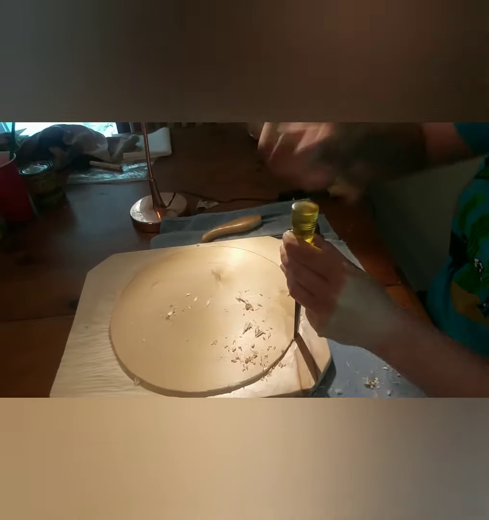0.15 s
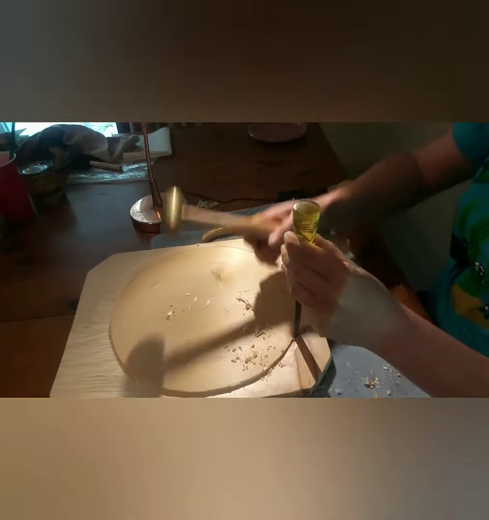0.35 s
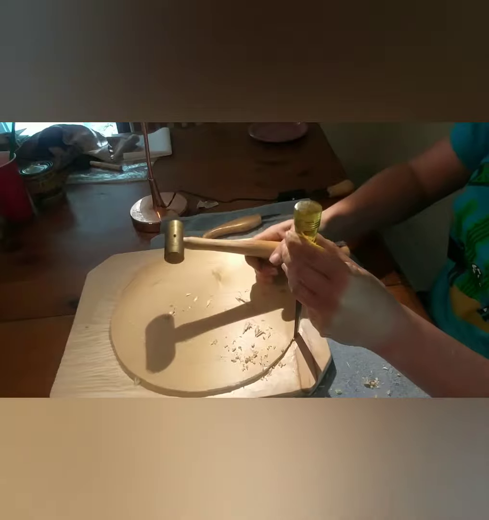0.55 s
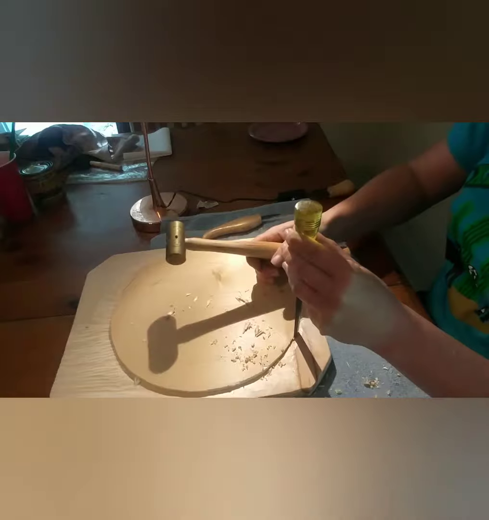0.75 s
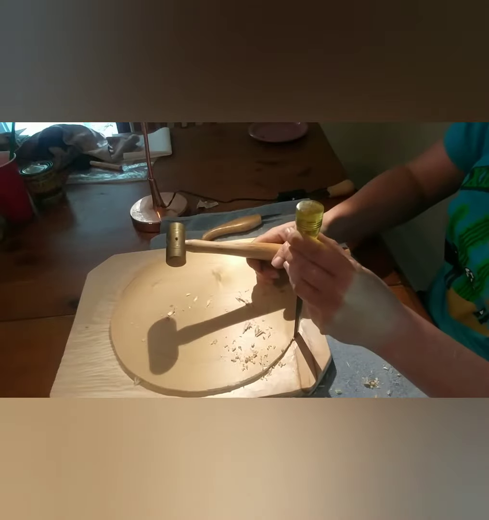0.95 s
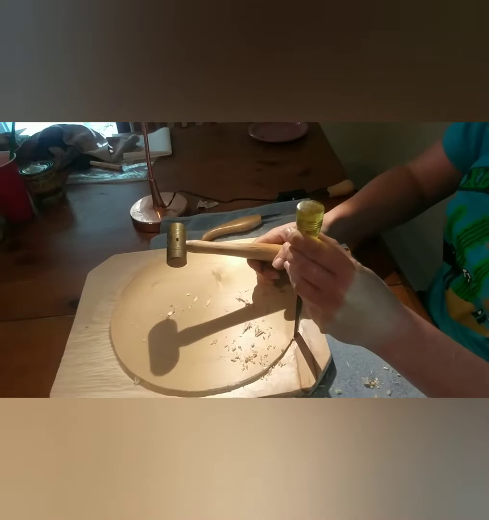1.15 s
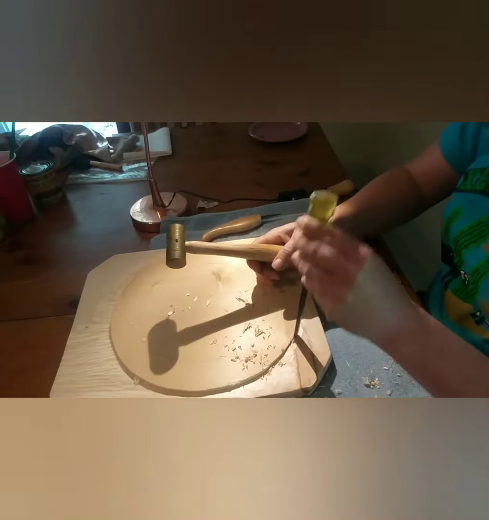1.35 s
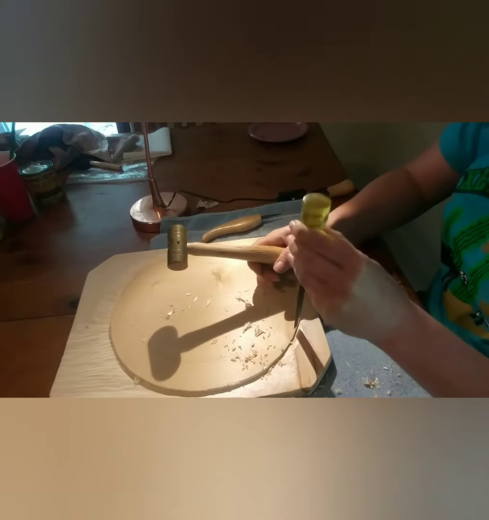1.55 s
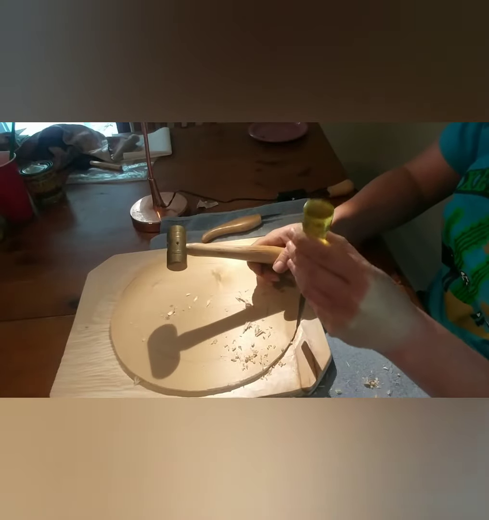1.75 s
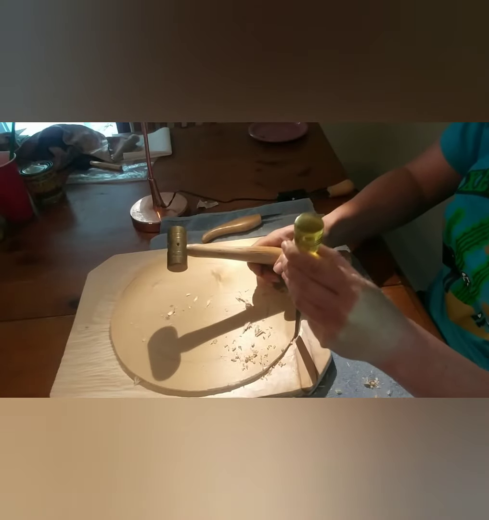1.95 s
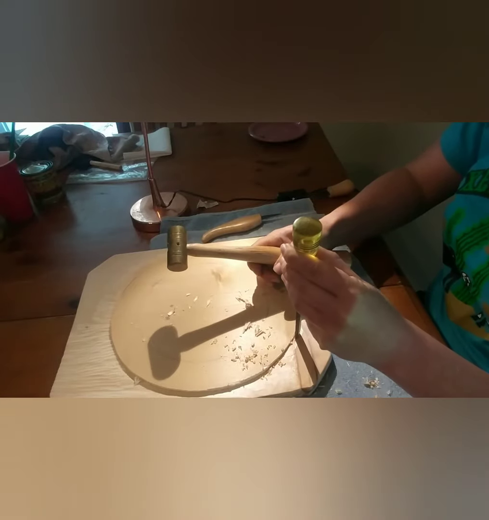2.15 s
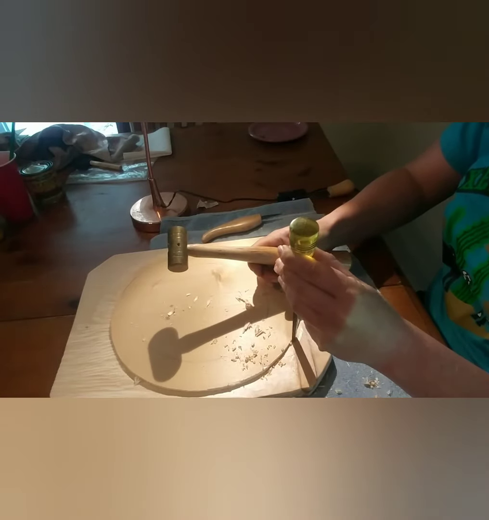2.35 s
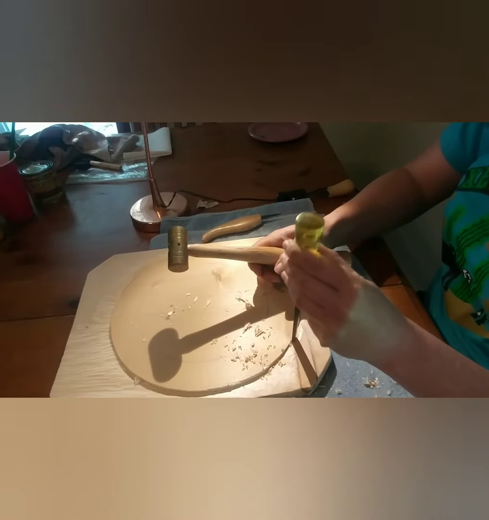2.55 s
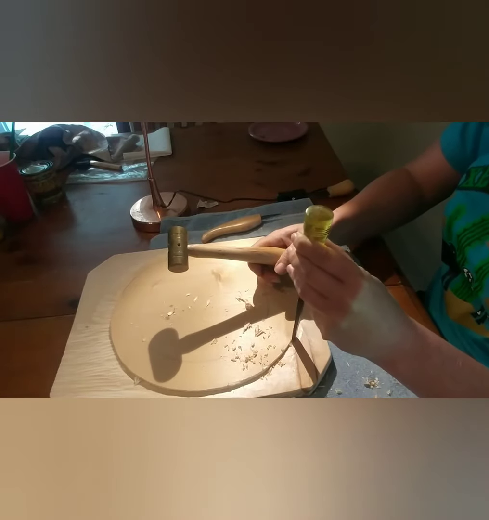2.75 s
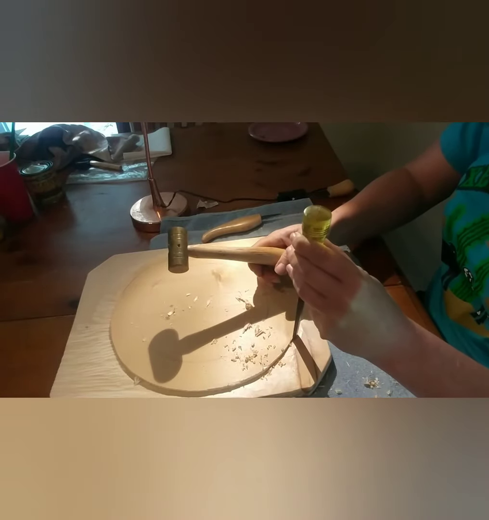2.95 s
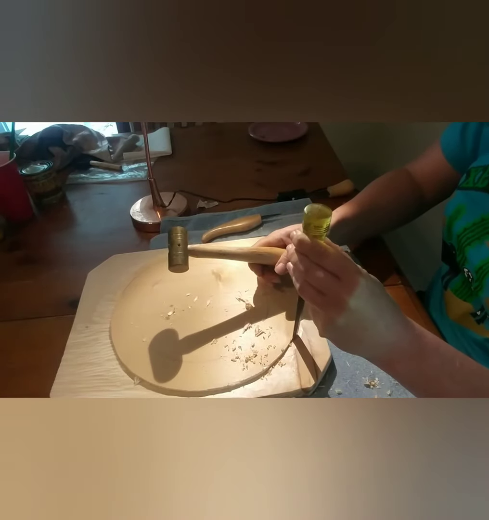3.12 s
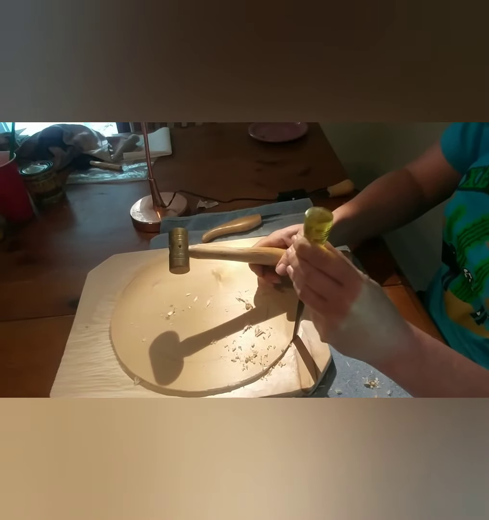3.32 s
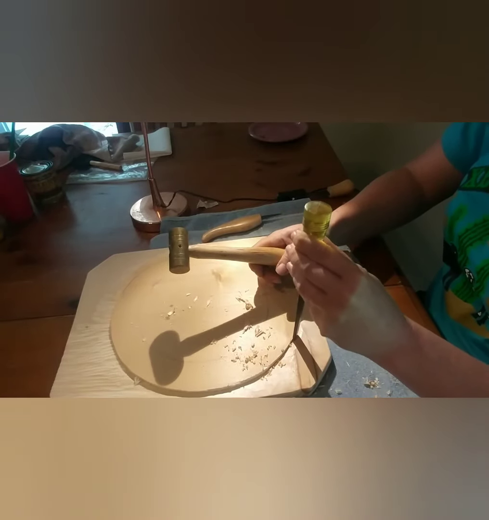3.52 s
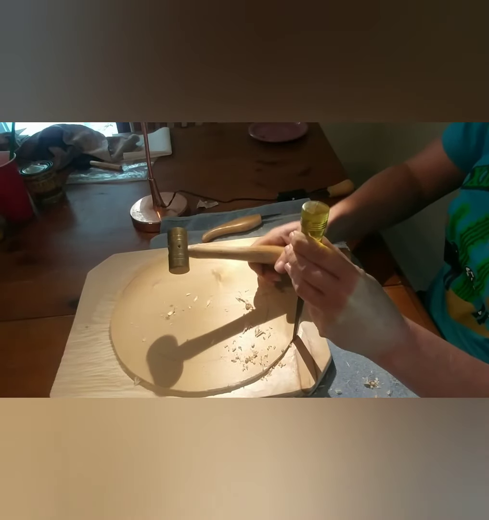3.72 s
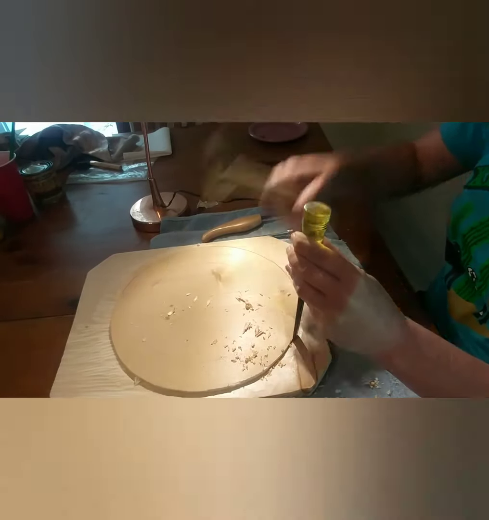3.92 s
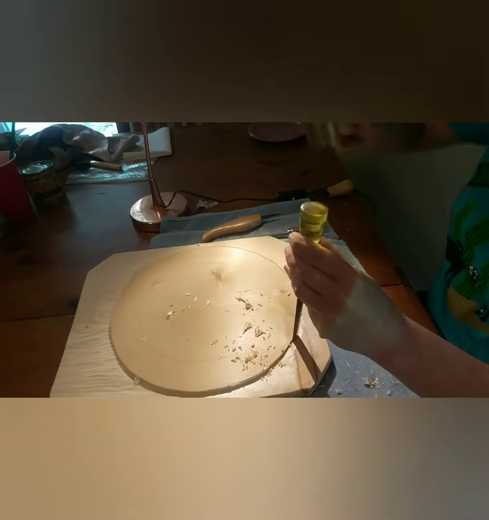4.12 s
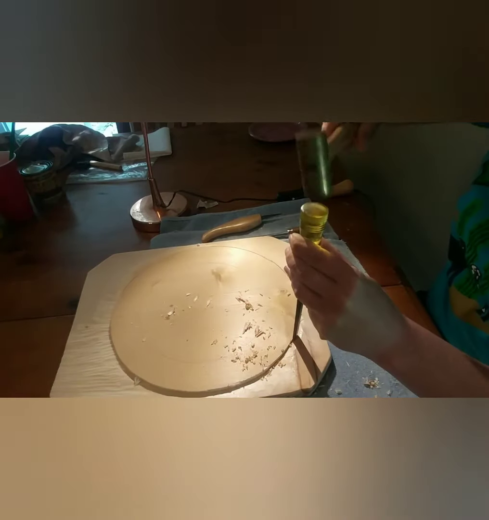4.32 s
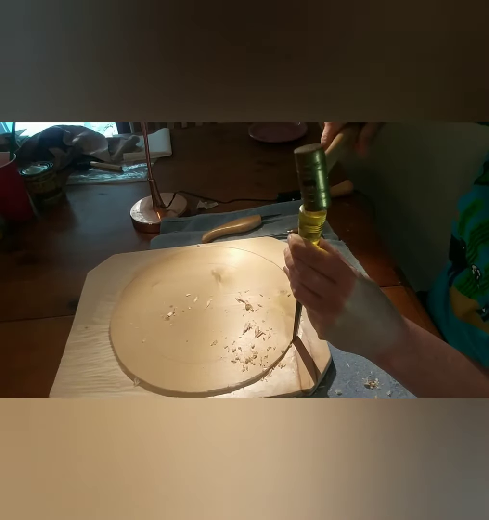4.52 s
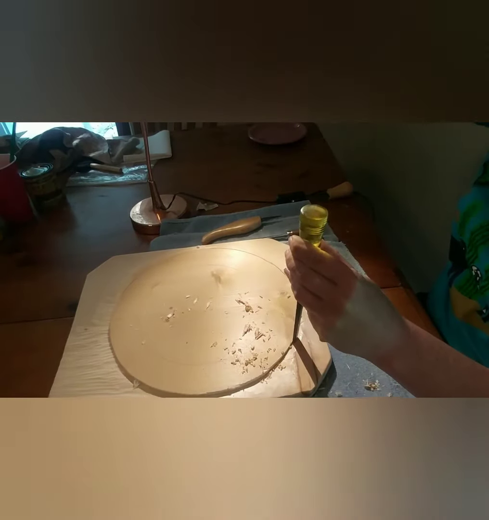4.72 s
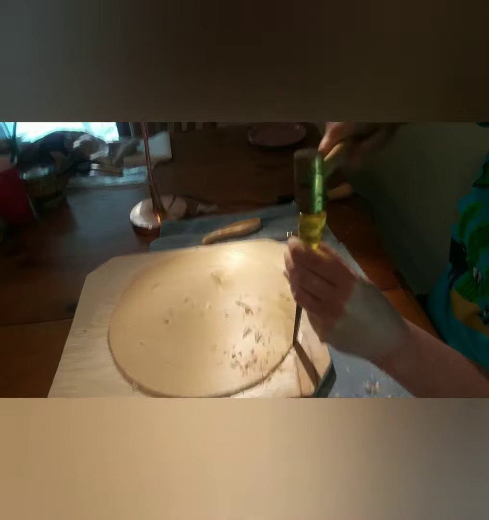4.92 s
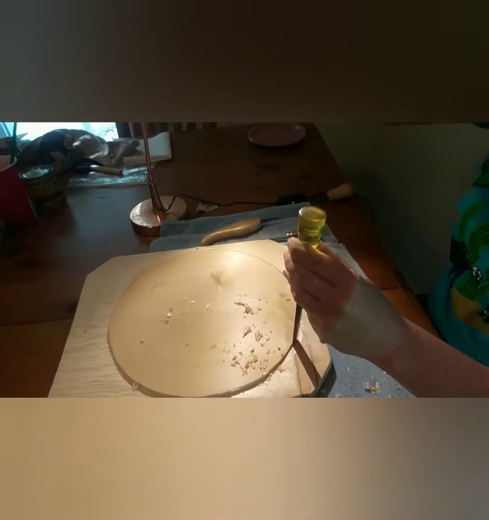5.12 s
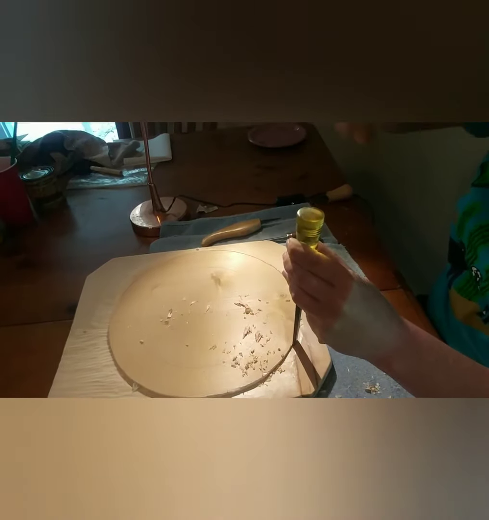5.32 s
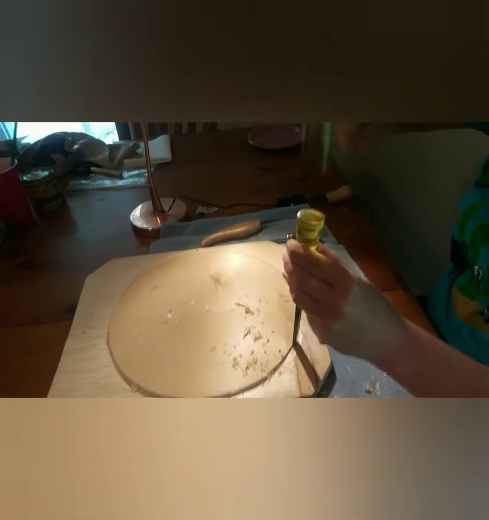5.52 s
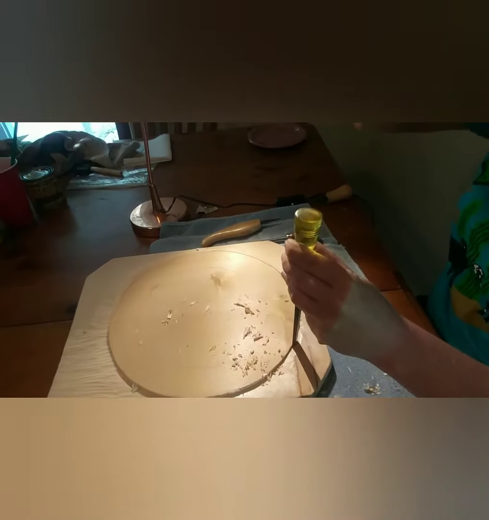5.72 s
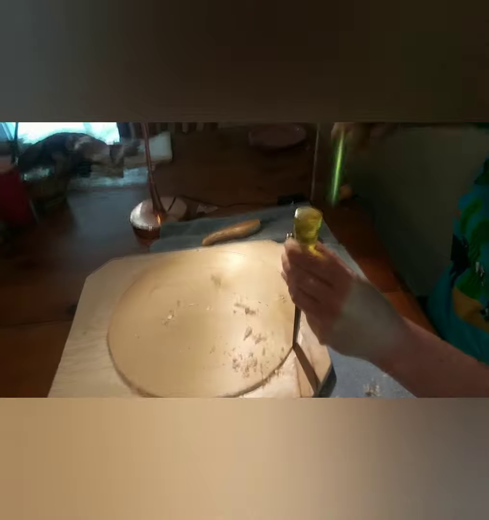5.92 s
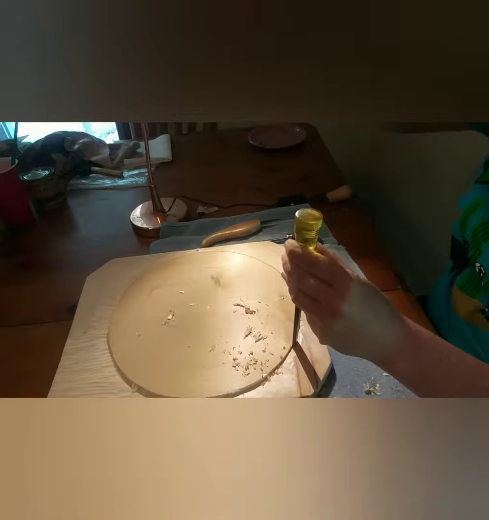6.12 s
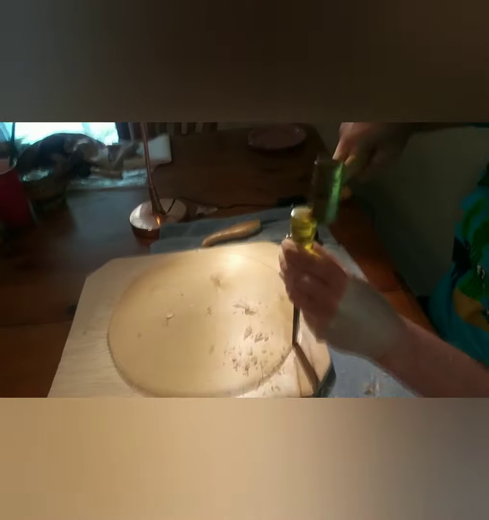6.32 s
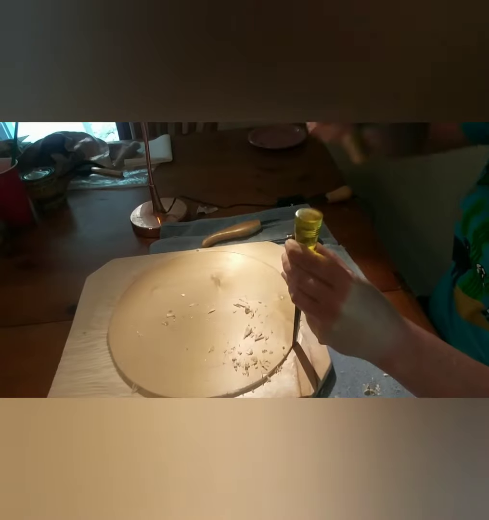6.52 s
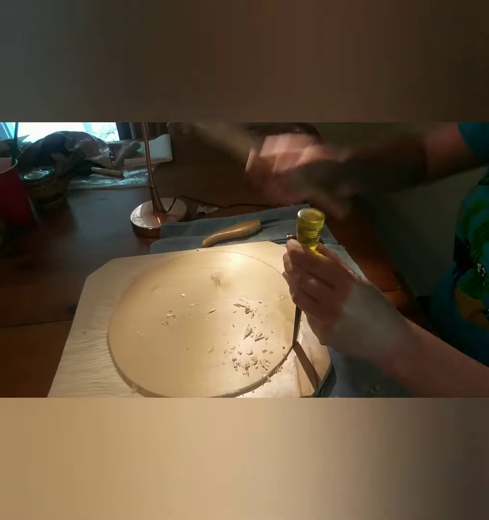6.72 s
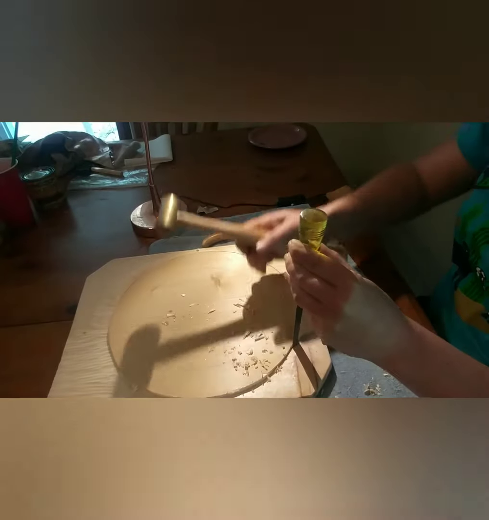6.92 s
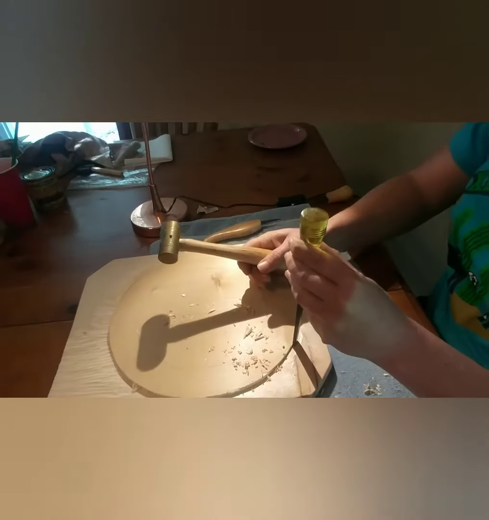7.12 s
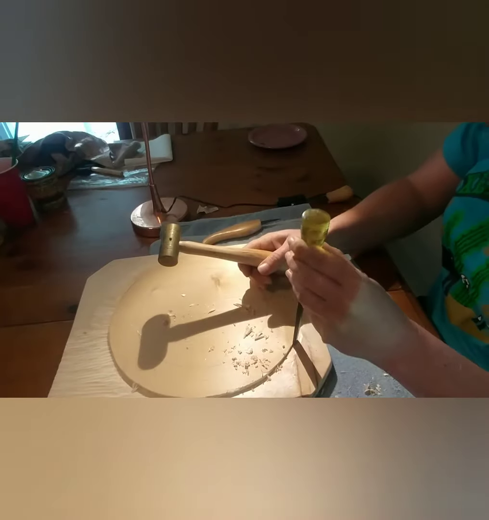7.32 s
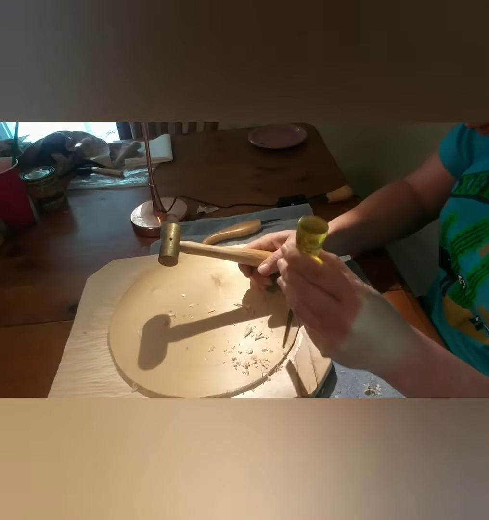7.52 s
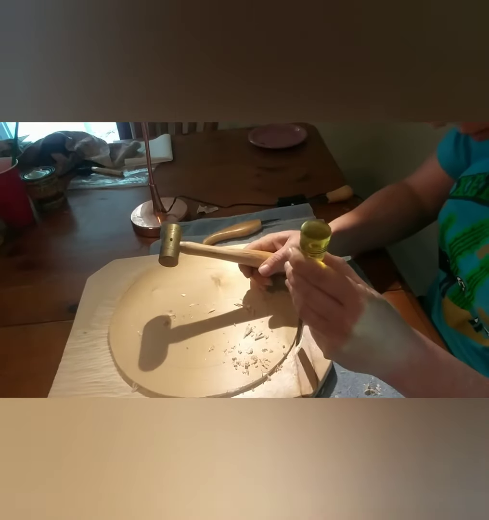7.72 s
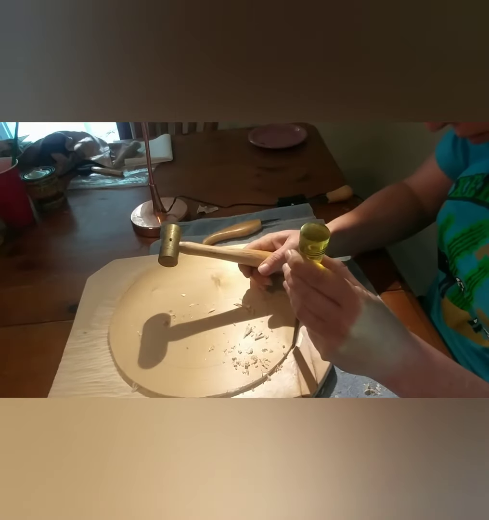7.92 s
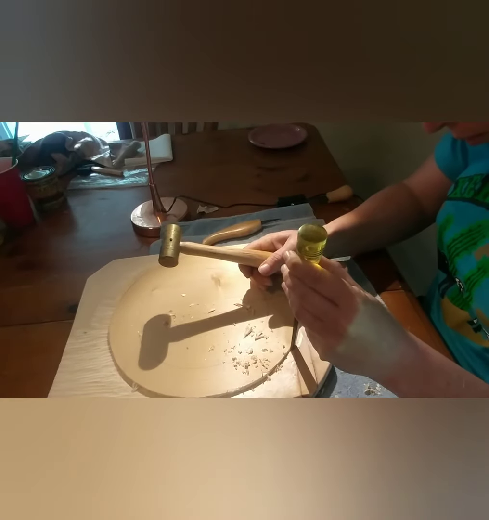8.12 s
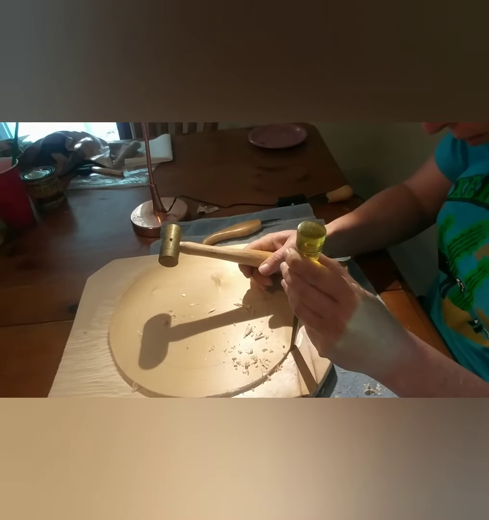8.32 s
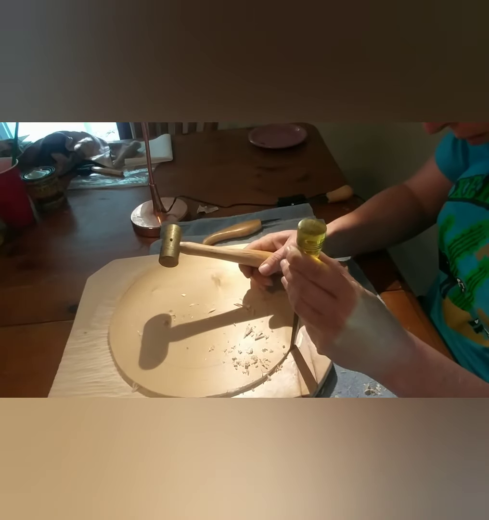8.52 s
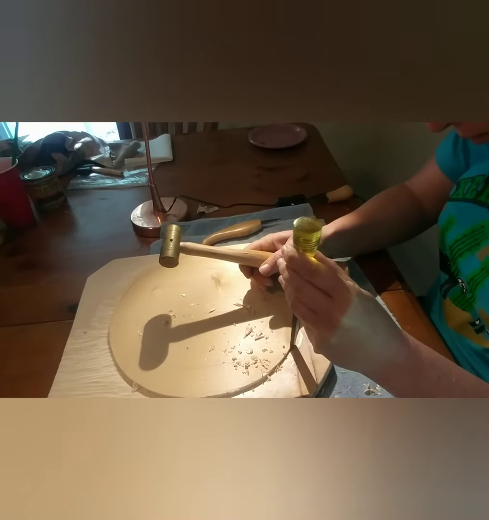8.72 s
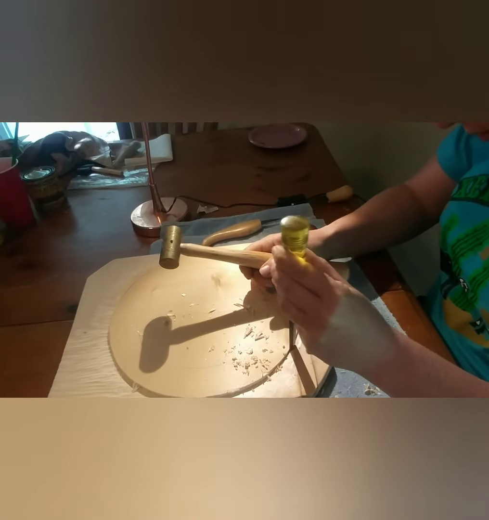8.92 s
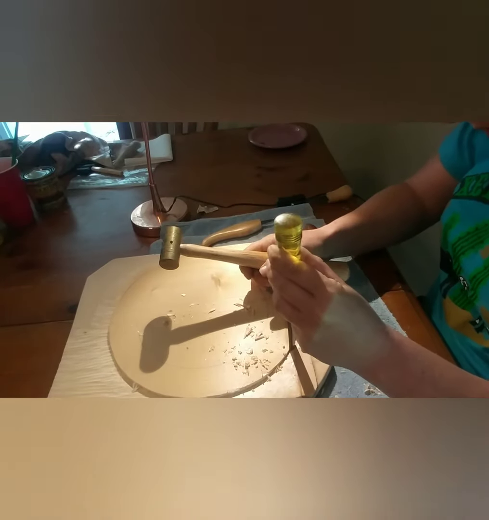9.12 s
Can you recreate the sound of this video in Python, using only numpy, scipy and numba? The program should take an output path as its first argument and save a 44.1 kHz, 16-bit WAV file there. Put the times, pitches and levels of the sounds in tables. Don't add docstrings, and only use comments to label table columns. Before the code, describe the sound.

A soft tap then four hard, ringing mallet blows on a chisel in wood, with water dripping and a small pump humming to the right.

```python
import sys
import numpy as np
from scipy import signal
from scipy.fft import rfft, irfft, next_fast_len
from scipy.io import wavfile
from scipy.ndimage import minimum_filter1d, map_coordinates
from numba import njit

SR = 44100
rng = np.random.default_rng(int(sys.argv[2]) if len(sys.argv) > 2 else 0)


def generate_wav(sig):
    pcm = np.round(np.clip(np.atleast_2d(sig).T, -1, 1) * 32767).astype(np.int16)
    wavfile.write(sys.argv[1], SR, pcm)


def gain_from_decibels(decibels):
    exponent = np.asarray(decibels, float) / 20
    return 10 ** exponent


N = 403956
LEAD = SR // 2

# frequency in Hz, level in dB per Hz.
AIR_SPECTRUM = [(15, -34.5), (25, -5), (58, -8), (185, -6.5), (335, -13), (439, -19), (545, -8.5),
                (775, -22.5), (1070, -17.5), (1190, -24), (3720, -18), (7510, -27), (10700, -42),
                (14000, -36), (15750, -34), (15900, -70)]
# frequency in Hz, left-right likeness from -1 to 1.
AIR_LIKENESS = [(60, 0.73), (180, 0.54), (550, 0.82), (1650, -0.51), (4970, -0.07), (15000, 0.08)]
# frequency in Hz, level in dB rms.
PUMP_ORDERS = [(59.2, -61.5), (118.4, -65), (177.6, -68), (236.9, -68), (414.5, -78.5), (500.6, -74.5),
               (592.2, -86), (710.6, -77)]
# frequency in Hz, t60 in seconds.
ROOM_DECAY = [(60, 0.41), (250, 0.29), (1000, 0.29), (3000, .3), (7000, 0.31), (9500, .25), (12500, 0.23)]
# frequency in Hz, left-right likeness from -1 to 1.
ECHO_LIKENESS = [(60, 0.9), (300, 0.9), (550, 0.25), (1650, 0.033), (4970, 0.07), (15000, 0.043)]
# start in seconds, peak level in dB, pitch in Hz.
CLEAR_DRIPS = [(0.2573, -50, 1800), (0.3805, -51, 3700), (0.7347, -49, 4000), (1.0385, -51, 3500),
               (1.3897, -50.5, 4340), (1.7997, -47, 3820), (1.8301, -36, 4340), (2.0012, -47, 3600),
               (2.5346, -45, 3300), (2.9551, -43, 3450), (3.2534, -44.5, 2690), (3.3607, -46, 3650),
               (3.444, -43, 2780), (3.5044, -40, 5260), (3.7438, -39.5, 3560), (3.9908, -48.5, 4200),
               (4.1813, -42, 3660), (4.3649, -46.5, 4200), (4.7989, -48.5, 2370), (6.7955, -44.5, 1950),
               (6.8464, -45, 4350), (6.9442, -41.5, 3900), (7.2175, -43, 3820), (7.4575, -48, 3790),
               (7.892, -49, 4490), (7.9479, -46, 3710), (8.3385, -45, 2236), (8.5959, -46, 4340),
               (8.6952, -41.5, 3760), (8.8109, -47, 3210)]
# start in seconds, peak level in dB, pitch in Hz.
HIGH_DRIPS = [(0.1558, -48.5, 7700), (0.2002, -48, 5500), (0.3369, -51.5, 7720), (0.5799, -47.5, 7400),
              (0.8093, -51, 6700), (1.184, -50, 7200), (1.2249, -49, 5500), (1.4643, -52, 7640),
              (1.7163, -49.5, 7660), (2.0116, -49, 6600), (2.44, -45, 4400), (2.8264, -46, 5750),
              (3.3597, -53, 6270), (3.5079, -49, 5950), (3.6201, -40, 6600), (3.7413, -54, 7400),
              (4.3165, -53, 6200), (4.5557, -43.5, 6600), (6.804, -52, 5970), (6.8928, -43, 6200),
              (6.9541, -48.5, 6640), (7.2515, -49, 5950), (7.3328, -50, 5700), (7.4755, -50.5, 5470),
              (7.8237, -54, 7330), (8.4896, -46, 7200), (8.8109, -49, 7460), (8.8768, -45.5, 6130),
              (9.0254, -45, 6100), (9.1492, -44, 5600)]
# start in seconds, level in dB, pitch in Hz,
# resonance width in Hz, table boom in dB.
LIGHT_KNOCKS = [
    (1.475, -27, 300, 500, 3),
    (2.030, -21.5, 380, 600, 10),
    (2.326, -22, 2750, 700, 0),
    (2.325, -35, 5840, 1200, -20),
    (2.831, -46, 450, 680, 7),
    (4.005, -43, 530, 120, -16),
    (4.191, -48, 1020, 150, -15),
    (8.093, -40, 380, 412, -5),
    (8.347, -28.5, 600, 500, -6),
    (8.338, -31, 300, 400, 2),
]
# frequency in Hz, level in dB, t60 in seconds.
BOOM_MODES = [(60, -12, .35), (76, -9, .35), (176, -10, 0.42), (243, -14, 0.5), (272, -12, .25),
              (297, -12.5, 0.43), (358.3, -12, 0.39)]
# frequency in Hz, t60 in seconds, swell time in seconds.
DEEP_NOTE = (143.5, .4, .03)
# frequency in Hz, level in dB, t60 in seconds.
WOOD_MODES = [(321.6, -10.5, 0.32), (456, -6.5, 0.29), (640, 2.5, 0.2), (498, -6.5, .3), (800, -3, 0.25),
              (906, -12.5, 0.36), (990, -10.5, 0.24), (1024, -14.5, 0.24), (1056, -18.5, 0.25),
              (1120, -21.5, 0.38)]
# frequency in Hz, level in dB, t60 in seconds.
HANDLE_MODES = [(900, -3, .012), (2600, -5, .014)]
# frequency in Hz, level in dB, t60 in seconds.
NUDGE_MODES = [(570, 2.5, .04), (460, -4, .05), (800, -8, .05), (340, -9, .07)]
# frequency in Hz, width in Hz, level in dB.
STEEL_PEAKS = [(1603, 33, -1.5), (2215, 52, -3), (2800, 72, -3), (3400, 81, -8.5), (3820, 43, -13)]
# frequency in Hz, level in dB per Hz.
CRACK_SPECTRUM = [(120, -41), (200, -0.5), (1030, 0.5), (3310, -7), (5760, -1), (7460, -16), (8970, -14),
                  (12000, -24), (14500, -21.5), (16500, -34)]
# frequency in Hz, level in dB per Hz.
BODY_SPECTRUM = [(18, -48), (30, -25.5), (133, -8.5), (354, -6), (381, -12.5), (452, -5), (812, -5),
                 (1140, -6.5), (1650, -11), (1770, -9), (2750, -9.5), (3270, -19), (6200, -28.5),
                 (7870, -34.5), (8800, -48), (10300, -63), (13400, -93), (22000, -120)]
# frequency in Hz, level in dB per Hz.
TAP_SPECTRUM = [(60, -26), (110, -20), (190, -22), (399, -4), (648, -3), (1000, -4), (1240, -24),
                (1550, -19), (2560, -26), (3360, -25), (6110, -40), (9000, -73), (11700, -102),
                (19800, -120)]
# start in seconds, peak level in dB, drive into the limiter in dB,
# table boom in dB, deep note in dB.
MALLET_BLOWS = [
    (4.936, 1, 23, -1, -17),
    (5.4062, 2.5, 24.5, -2, -21),
    (5.8404, 10, 19, -4.5, -22),
    (6.246, 0, 27.5, -3, -24),
]
EARLIER_BLOW = (-0.16, -10, 28, 2, -22)
# start in seconds, level in dB, boom in dB, deep note in dB.
SETTING_TAP = (4.436, -1, 2, -11)


def along(points, hz):
    f, v = np.transpose(points)
    return np.interp(np.log(hz + 1), np.log(f + 1), v)


def unit(x):
    return x / np.sqrt(np.mean(x ** 2) + 1e-20)


def wobble(rate):
    knots = rng.standard_normal(int(N * rate / SR) + 4)
    return map_coordinates(knots, [np.arange(N) * rate / SR])


def filtered(x, response):
    m = next_fast_len(x.shape[-1] + 8192)
    return irfft(rfft(x, m) * response(np.fft.rfftfreq(m, 1 / SR)), m)[..., :x.shape[-1]]


def causal(gain, size=4096):
    cepstrum = irfft(np.log(gain(np.fft.rfftfreq(size, 1 / SR)) + 1e-6), size)
    cepstrum[1:size // 2] *= 2
    cepstrum[size // 2 + 1:] = 0
    pulse = irfft(np.exp(rfft(cepstrum)), size)
    return pulse / np.linalg.norm(pulse)


def paired(two, alike):
    turn = lambda hz: np.arccos(np.clip(along(alike, hz), -1, 1)) / 2
    mid, side = filtered(two, lambda hz: np.array([np.cos(turn(hz)), np.sin(turn(hz))]))
    return np.array([mid + side, mid - side])


def add(track, s, sound):
    part = track[:, LEAD + round(s * SR):][:, :sound.shape[1]]
    part += sound[:, :part.shape[1]]


def echo(size=SR // 2, build=0.0013):
    hz, t, z = signal.stft(rng.standard_normal((2, size)), SR, nperseg=256)
    fade = gain_from_decibels(-60 * t / along(ROOM_DECAY, hz)[:, None])
    tail = signal.istft(z * fade, SR, nperseg=256)[1][:, :size]
    tail = paired(tail * (1 - np.exp(-np.arange(size) / SR / build)), ECHO_LIKENESS)
    return tail / np.linalg.norm(tail[0])


def pump():
    t = np.arange(N) / SR
    beat_s, beat_top_s, beat_share, beat_db = 1.66, 1.5, 0.55, 3.5
    beat = 1 + beat_share * np.exp(2j * np.pi * (t - beat_top_s) / beat_s)
    swell_db = beat_db + 20 * np.log10(np.abs(beat))
    drift = np.cumsum(0.004 * wobble(2.9)) / SR
    hum = np.zeros(N)
    for k, (hz, db) in enumerate(PUMP_ORDERS):
        level = gain_from_decibels(db + 3.5 + swell_db / (k + 1) + 1.1 * wobble(12))
        hum += level * np.sin(2 * np.pi * (hz * (t + drift) + rng.random()))
    shade = lambda hz: gain_from_decibels(-7 * np.exp(-np.log((hz + 1) / 4000) ** 2))
    low_cut = lambda hz: 1 / (1 + (44 / (hz + 1)) ** 8)
    color = lambda hz: gain_from_decibels(along(AIR_SPECTRUM, hz)) * shade(hz) * low_cut(hz)
    air = unit(paired(filtered(rng.standard_normal((2, N)), color), AIR_LIKENESS))
    return (hum + gain_from_decibels(-57.5 + 0.72 * wobble(5)) * air) * gain_from_decibels([[-1.5], [1.5]])


def bubbles(hz, cycles, rise=0.067):
    t = np.arange(1024) / SR
    age = t * hz[:, None] / cycles
    phase = 2 * np.pi * hz[:, None] * t * (1 + rise * np.minimum(age, 2))
    tone = np.exp(-age * 3) * (1 - np.exp(-t / 0.0001)) * np.sin(phase)
    return tone / np.linalg.norm(tone, axis=1, keepdims=True)


def from_right(dry, size=8192, direct_db=9, wet_db=19):
    wet = gain_from_decibels(wet_db) * signal.fftconvolve(echo(size=size), dry[None], axes=1)
    wet[0, 12:12 + len(dry)] += gain_from_decibels(direct_db) * dry
    wet[1, :len(dry)] += gain_from_decibels(direct_db) * dry
    return gain_from_decibels([[-1.7], [1.7]]) * wet


def trickle(track, count=280, spots=6):
    for _ in range(spots):
        when, size, pitch, life = rng.random((count, 4)).T
        level = gain_from_decibels(-66 - 5.4 * np.log(1.06 - size))
        rows = level[:, None] * bubbles(1500 * 5.5 ** pitch, 4 + 14 * life[:, None] ** 2)
        at = (when * N).astype(int)[:, None] + np.arange(rows.shape[1])
        add(track, 0, from_right(np.bincount(at.ravel(), rows.ravel())))


def drips(track):
    for rows, cycles in ((CLEAR_DRIPS, 14), (HIGH_DRIPS, 11)):
        for s, db, hz in rows:
            pitches = hz * np.exp(rng.normal(0, 0.15, 3) * [0, 1, 1])
            main, second, third = bubbles(pitches, cycles)
            weaker = np.pad(second, (300, 600)) + np.pad(third, (900, 0))
            drop = np.pad(main, (0, 900)) + gain_from_decibels(-5) * weaker
            add(track, s, gain_from_decibels(db) * from_right(drop))


def ring(modes, late=0):
    t = np.maximum(np.arange(SR // 2) / SR - late, 0)
    return sum(gain_from_decibels(db - 60 * t / t60) * np.sin(2 * np.pi * hz * t) for hz, db, t60 in modes)


def boom(swell=0.0097):
    t = np.arange(SR // 2) / SR
    varied = [(hz, db + rng.normal(0, 1), t60) for hz, db, t60 in BOOM_MODES]
    return ring(varied) * (1 - np.exp(-t / swell)) ** 2


def drum():
    hz, t60, swell = DEEP_NOTE
    return ring([(hz, 0, t60)]) * (1 - np.exp(-np.arange(SR // 2) / SR / swell))


def wood():
    t = np.arange(SR // 2) / SR
    sound = np.zeros((2, len(t)))
    for hz, db, t60 in WOOD_MODES:
        skew = rng.normal(0, hz / 900, (2, 1))
        sound += gain_from_decibels(db + rng.normal(0, 2) - 60 * t / t60) * np.sin(2 * np.pi * hz * t + skew)
    return sound * (1 - np.exp(-t / 0.001))


def spread_out(pulse, bend=0.058):
    return filtered(pulse, lambda hz: np.exp(-4j * np.pi * bend * np.sqrt(hz)))


def strike(direct, body, direct_db, wet_db, boom_db):
    sound = gain_from_decibels(wet_db) * signal.fftconvolve(echo(), body[None], axes=1)[:, :SR // 2]
    later = filtered(direct, lambda hz: np.exp(-2j * np.pi * hz * 0.6 / SR))
    sound[:, :len(direct)] += gain_from_decibels(direct_db) * np.array([later, direct])
    return sound + gain_from_decibels(boom_db) * boom()


def knocks(track):
    damping = gain_from_decibels(-60 * np.arange(SR // 2) / SR / 0.9)
    for s, db, hz, width_hz, low_db in LIGHT_KNOCKS:
        scrape_db = -28 + 4 * np.log2(hz / 400)
        resonance = lambda f: (f * width_hz / np.abs(hz * hz - f * f + 1j * f * width_hz)) ** 2
        peak = lambda f: resonance(f) / (1 + (f / (hz + 1.3 * width_hz)) ** 6)
        body = causal(lambda f: peak(f) + gain_from_decibels(scrape_db) / (1 + (f / 4500) ** 4))
        sound = strike(body, body, direct_db=10, wet_db=18.5, boom_db=low_db - 16)
        sound = damping * (sound + gain_from_decibels(low_db - 21) * drum())
        add(track, s, gain_from_decibels(db + np.array([[-1], [1]])) * sound)


def setting_tap(track):
    s, db, low_db, deep_db = SETTING_TAP
    tap = causal(lambda hz: gain_from_decibels(along(TAP_SPECTRUM, hz)) + gain_from_decibels(-64))
    sound = strike(tap, tap, direct_db=-8, wet_db=15.5, boom_db=low_db - 20) + gain_from_decibels(deep_db) * drum()
    soft = (1 - np.exp(-np.arange(SR // 2) / SR / 0.0008)) ** 2
    add(track, s, gain_from_decibels(db) * (sound + gain_from_decibels(-22) * wood() - gain_from_decibels(0.5) * soft * ring(NUDGE_MODES)))


def steel(hz):
    return 1 + 1.4 * sum(gain_from_decibels(db) / (1 + (2 * (hz - c) / w) ** 2) for c, w, db in STEEL_PEAKS)


def shimmer(hz):
    return np.exp(-((hz - 12200) / 1200) ** 2) + gain_from_decibels(-11) * np.exp(-((hz - 15000) / 900) ** 2)


def mallet(track):
    contact_s = 0.0014
    crack = spread_out(causal(lambda hz: gain_from_decibels(along(CRACK_SPECTRUM, hz))))
    for s, peak_db, drive_db, low_db, deep_db in [*MALLET_BLOWS, EARLIER_BLOW]:
        shimmer_db = -37 - 0.8 * (drive_db - 21)
        color = lambda hz: gain_from_decibels(along(BODY_SPECTRUM, hz)) * steel(hz) + gain_from_decibels(shimmer_db) * shimmer(hz)
        body = spread_out(causal(color))
        blow = strike(crack, body, direct_db=16, wet_db=21, boom_db=low_db - 18)
        blow = blow + gain_from_decibels(deep_db) * drum() + gain_from_decibels(-17.5) * wood()
        blow = blow + gain_from_decibels(2.5) * ring(HANDLE_MODES, late=0.0011)
        add(track, s + contact_s, gain_from_decibels(peak_db + drive_db) * blow)


def scene():
    track = np.zeros((2, N + LEAD))
    for source in (trickle, drips, knocks, setting_tap, mallet):
        source(track)
    return track[:, LEAD:] + pump()


@njit
def follow(peak, attack, release):
    level = np.zeros_like(peak)
    for i in range(1, len(peak)):
        speed = attack if peak[i] > level[i - 1] else release
        level[i] = level[i - 1] + speed * (peak[i] - level[i - 1])
    return level


def low_pass(x):
    return signal.sosfilt(signal.butter(12, 16790, fs=SR, output="sos"), x)


def record(dry):
    coming = -minimum_filter1d(-np.abs(dry).max(0), size=61)
    level = follow(coming, 1 / (0.00034 * SR), 1 / (0.019 * SR))
    held = dry / (1 + (level / gain_from_decibels(2)) ** 6) ** (1 / 6)
    held = 0.96 * held / (1 + np.abs(held) ** 12) ** (1 / 12)
    mix = filtered(held, lambda hz: 1 / (1 + (hz / 16400) ** 60))
    return low_pass(mix)


dry = scene()
out = record(dry)
generate_wav(out)
```